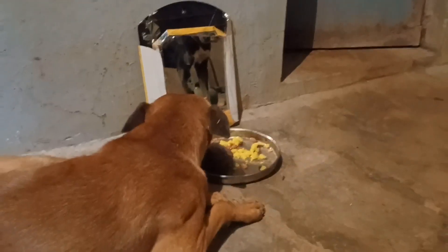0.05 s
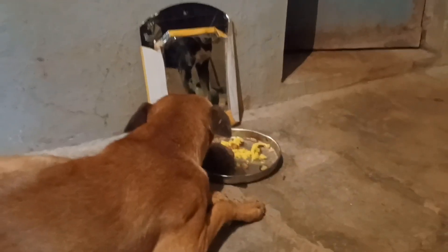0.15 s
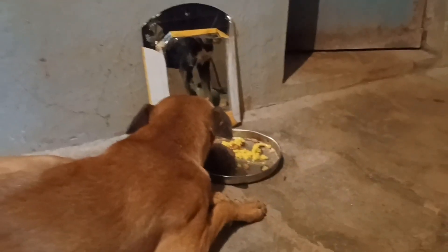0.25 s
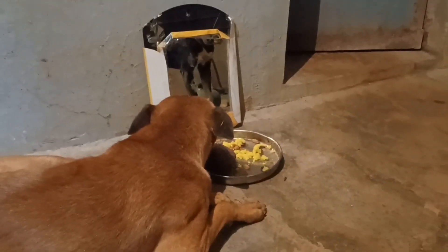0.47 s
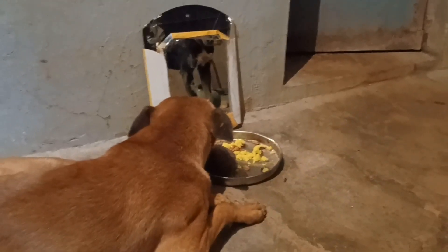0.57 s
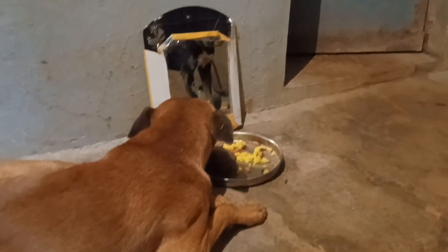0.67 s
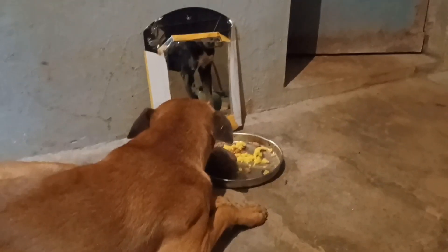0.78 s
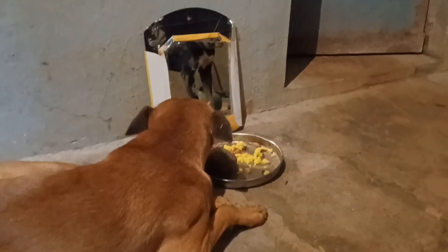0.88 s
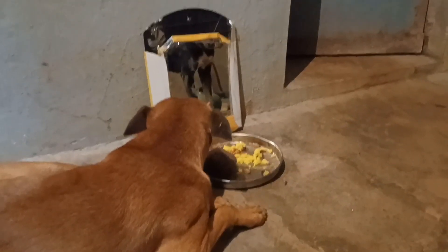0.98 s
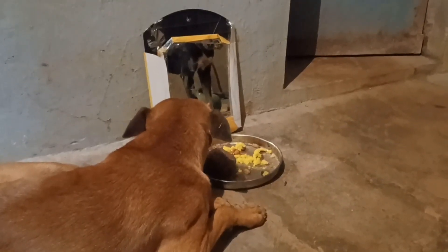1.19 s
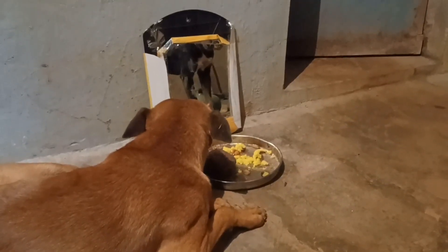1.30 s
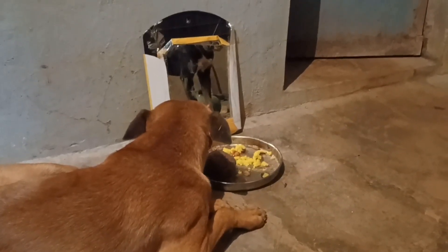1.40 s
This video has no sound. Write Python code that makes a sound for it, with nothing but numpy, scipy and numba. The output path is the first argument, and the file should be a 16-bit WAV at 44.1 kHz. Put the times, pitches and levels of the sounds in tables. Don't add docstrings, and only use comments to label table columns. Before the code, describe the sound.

A dog close to the microphone smacks its wet lips, growls low, opens into a loud raspy snarl, groans with mouth nearly shut, then whimpers briefly upward; small bare-walled space, faint distant murmur.

```python
import sys
import numpy as np
from scipy import signal
from scipy.fft import rfft, irfft, next_fast_len
from scipy.io import wavfile
from scipy.ndimage import uniform_filter1d, minimum_filter1d
from numba import njit

SR = 44100
rng = np.random.default_rng(int(sys.argv[2]) if len(sys.argv) > 2 else 0)


def ratio_of_db(decibels):
    return 10 ** (np.asarray(decibels, float) / 20)


def unload_audio(sound):
    columns = np.transpose(np.atleast_2d(sound))
    steps = np.round(np.clip(columns, -1, 1) * 32767)
    wavfile.write(sys.argv[1], SR, steps.astype(np.int16))


N = 63945

# [f/Hz, level/dB]
MURMUR = [(40, -4.5), (100, -2.5), (230, 1), (400, -13), (700, -23.5), (1300, -18.5), (4000, -36),
          (15000, -38.5)]
MURMUR_DB, MURMUR_EARLY_DB, MURMUR_PATCHY_DB = -62.5, 11, 2
# [f/Hz, width/Hz, level/dB]
HUM = [(238, 5.3, -67.5), (610, 17, -80), (740, 25, -97), (870, 19, -91.5)]
# [t/s, f/Hz, level/dB, length/s]
HUM_SWELLS = [(-0, 610, 6.5, .02), (1.263, 238, 13.5, 0.022), (1.268, 870, 17, 0.034),
              (1.305, 740, 19, 0.011), (1.298, 610, 4, 0.023), (1.4, 610, -4, 0.013),
              (1.44, 610, 4.5, 0.0148)]

ROOM_DB, ROOM_T60_S, WALL_CUT_HZ, SIDE_FROM_HZ = -19.5, 0.22, 1300, 290

# [t/s, peak level/dB, extra level away from the main ring/dB]
SMACKS = [
    (0.0496, -40, 6.5),
    (.072, -45.5, 17.5),
    (0.0817, -28.5, -1),
]
# [f/Hz, level/dB, t60/s]
LIP_RINGS = [(610, -4, .025), (1314, -14, 0.021), (253, -18.5, 0.18), (2160, -34.5, 0.0144)]
LIP_SOFT_HZ = 260
SNUFFLE_S = (.045, .09, .118, .14)
SNUFFLE_DB, SNUFFLE_OPEN = -52.5, 1

# [t/s, level/dB]
RUMBLE = [(0, -78), (.065, -47.5), (.09, -76.5), (.115, -61), (.14, -71), (0.159, -40.5), (.28, -31),
          (.46, -41.5), (.52, -55.5), (.85, -57), (.93, -51), (1.041, -44), (1.07, -58), (1.2, -82.5)]
RUMBLE_HZ, RUMBLE_WIDTH_HZ = 90, 50

# [f/Hz, width/Hz, level/dB mouth shut, gain/dB wide open]
HISS = [(3127, 250, -41, -2), (4010, 420, -59.5, 10.5), (4900, 490, -60, -10), (5670, 240, -55.5, 3.5),
        (6710, 2100, -49, 7), (9340, 1500, -55, 7), (12150, 990, -57.5, 16.5), (14500, 1500, -57.5, 16)]
HISS_LIKENESS = 0.14
HISS_FOLLOWS = 0.71
HISS_PAN_DB, HISS_PAN_TOP_DB = -4.5, -2.4
FANG_RISE = 0.15

# [f/Hz, width/Hz, level/dB mouth shut, gain/dB wide open, share f rises wide open]
THROAT = [(118, 34.1, -0.5, -1, 0.28), (232.8, 71.4, 5, -6, 0.26), (578, 100.7, -16, 20.5, 0.0047),
          (937.7, 113, -29.5, 21.5, 0.034), (1207, 83, -30, 21, 0.12), (1600, 160, -37.5, 9, 0.0033),
          (1953, 76.3, -37, 34.5, 0.028), (2350, 287, -49, 26, 0.01), (3464, 410, -35, 20, 0.16)]
# [left minus right/dB, left leads/rad]
ARRIVAL = [(-2, .05), (-3.4, .25), (-1, .75), (-3, 1.0), (-5, 1.4), (-5, 1.6), (-6.5, .8), (-6, -1.0),
           (-3, -2.0)]
THROAT_CUT_HZ, WANDER, WANDER_DB = 3306, .015, 1.5
NOSE_HZ, NOSE_WIDTH_HZ, NOSE_SHARE = 486, 260, 0.22

# [t/s, pitch f/Hz, level/dB, roughness 0-1, mouth opening 0-1]
GROWL = [
    (.146, 96.14, -38.5, 0.23, 0.15),
    (.165, 96, -29, 0.37, 0.42),
    (.2, 100.6, -26.5, 0.4, 0.29),
    (.24, 105.7, -22.5, 0.44, 0.38),
    (.29, 104.1, -22, 0.32, 0.31),
    (.325, 123.9, -18.5, 0.7, 0.16),
    (.35, 128.6, -20, 0.28, 0.44),
    (.375, 134.5, -17, 0.54, 0.3),
]
# [t/s, pitch f/Hz, level/dB, roughness 0-1, mouth opening 0-1]
SNARL = [
    (.375, 124.3, -16.5, 0.75, 0.33),
    (.425, 118, -18, 0.82, 0.26),
    (.46, 116.9, -18.5, 0.68, 0.49),
    (.51, 128.3, -17.5, 0.67, 0.43),
    (.55, 140.1, -10, 0.64, 0.86),
    (.585, 142.9, -4, .9, 1.02),
    (.625, 145.5, -15.5, 1, 0.88),
    (.685, 129, -28.5, 0.88, 0.26),
]
# [t/s, pitch f/Hz, level/dB, roughness 0-1, mouth opening 0-1]
GROAN = [
    (.66, 123.1, -22.5, .6, 0.23),
    (.73, 125.8, -24, 0.64, 0.039),
    (.8, 121.6, -26, .72, 0.059),
    (.86, 118, -24, .45, 0.014),
    (.905, 126.7, -23.5, 0.39, 0.13),
    (.94, 124.8, -29.5, 0.18, 0.44),
    (.982, 139.6, -24.5, 0.29, 0.22),
    (1.0, 132.7, -33, 0.23, 0.44),
]
# [t/s, pitch f/Hz, level/dB, roughness 0-1, mouth opening 0-1]
WHIMPER = [
    (.998, 200.1, -32, 0.24, 0.2),
    (1.025, 210.6, -30, 0.043, 0.2),
    (1.055, 222.7, -28, 0.021, 0.39),
    (1.097, 239, -29, .04, 0.3),
    (1.112, 325.4, -27, 0.5, 0.24),
    (1.132, 349.9, -31, 0.27, 0.22),
    (1.152, 329.8, -32, .45, 0.27),
    (1.176, 221.5, -27, 0.29, 0.094),
    (1.205, 219, -52.5, 0.6, 0.28),
]
GROWL_SHAPE = 0.42, [0.3, 3.1, 5.5, 0, 2.5, 6, -8], [0.089, 0.1, 1.4, 12, 0.5, 6.4, 0.1], [-17.5, -9.5,
               -12.5, -2.5, 2.5, -7, -5.5, 1.5]
SNARL_SHAPE = 0.88, [0.9, -0.74, 5.5, 6, -4, 0, -5.5], [1.8, -1.8, -0.75, -1.9, 0.5, 4, -3], [8.5, -8, -4.5,
               2.5, -1, -2, 3, 0]
GROAN_SHAPE = 0.45, [2, 7.5, -13.5, 2.5, -2.5, 3.5, -3.5], [3.5, -1.5, 14.5, -5.5, 2, 0, 0.5], [-7, 8.5,
               8.5, 0.5, 5.5, 3, -4, -2]
WHIMPER_SHAPE = 0.011, [8, 4.5, -3, -18, 6, 3.5, 1.5], [-1, 3, 15.5, -6.5, 2, -2.5, -1.5], [-10.5, 7.5, 6.5,
                 1.5, 2, 11, -6, 3.5]
# [t/s, depth/dB, length/s]
CATCHES = [(0.312, 9.5, 0.0044), (0.321, -1.5, 0.015), (0.348, 6, .008), (0.368, 7.5, .005),
           (0.401, 7.5, 0.0052), (0.413, 6, 0.0034), (.45, 4.5, .007), (0.482, 8.5, 0.0073),
           (0.543, 7.5, 0.0059), (0.55, -5, 0.0065), (0.564, 6.5, .004), (0.58, 5, 0.0041),
           (0.585, 3, .006), (0.607, 11, .007), (0.618, -6.5, 0.0081), (0.629, 6, 0.0097),
           (0.692, 1, 0.009), (0.76, 1, 0.0075), (0.807, 6, 0.0079), (0.854, 4.5, 0.0095),
           (0.877, 4, 0.0034), (1.12, 2.5, .004), (1.165, 8, 0.005)]
RELEASE_SHARE = .45
FADE_S, PULSE_CUT_HZ, SECOND_FULL_AT = 0.0031, 736, 0.17
BREATH_DB, BREATH_FROM_HZ, RASP_DB = -18, 1810, -10.5
JITTER, JITTER_HZ, SHIMMER_DB, FLUTTER_DB, FLUTTER_HZ = .105, 70, 2.6, 1.3, 28
CHEST_BELOW_HZ = 170
GAPE_FROM, GAPE_CHEST_DB = .62, -43.5

LIMIT, LOW_CUT_HZ = .8, 82


def rms_one(x):
    return x / np.sqrt(np.mean(x ** 2) + 1e-20)


def evened(x):
    power = uniform_filter1d(uniform_filter1d(np.mean(x ** 2, axis=0), size=900), size=900)
    return x / np.sqrt(power + 1e-12)


def drift(hz):
    r = np.exp(-2 * np.pi * hz / SR)
    return rms_one(signal.lfilter([1], [1, -2 * r, r * r], rng.standard_normal(N + 9000))[9000:])


def filtered(x, order, hz, kind="low"):
    return signal.sosfilt(signal.butter(order, hz, kind, fs=SR, output="sos"), x)


def tilt(db):
    return ratio_of_db(np.array([[db], [-db]]))


@njit
def resonate(x, hz, width, sr):
    out, r = np.zeros(len(x)), np.exp(-np.pi * width / sr)
    for i in range(2, len(x)):
        push = (1 - r * r) / 2 * (x[i] - x[i - 2])
        out[i] = push + 2 * r * np.cos(2 * np.pi * hz[i] / sr) * out[i - 1] - r * r * out[i - 2]
    return out


def hum():
    t, out = np.arange(N) / SR, 0
    for hz, width, db in HUM:
        level_db = db + 2.2 * drift(15)
        for s, at_hz, up_db, length in HUM_SWELLS:
            if abs(at_hz / hz - 1) < 1 / 10:
                level_db = level_db + up_db * np.exp(-((t - s) / length) ** 2)
        tone = resonate(rng.standard_normal(N), np.full(N, 1. * hz), width, SR)
        out = out + ratio_of_db(level_db) * rms_one(tone)
    return out * tilt(-1.7)


def far_murmur():
    out, edges = 0, 35 * 2 ** np.arange(0, 8.9, .4)
    hz, db = np.transpose(MURMUR)
    white = rng.standard_normal((2, 2, N))
    for k, (low, high) in enumerate(zip(edges, edges[1:])):
        mid, side = filtered(white[k % 2], 2, [low, high], "band")
        gain = ratio_of_db(np.interp(np.log(low * high) / 2, np.log(hz), db) + MURMUR_PATCHY_DB * drift(24))
        spread = np.clip(low / 3000, .15, 1) * side * [[1], [-1]]
        out = out + gain * (mid * tilt(-1.5) + spread)
    sinking = ratio_of_db(MURMUR_EARLY_DB * np.linspace(1, 0, N))
    return sinking * (ratio_of_db(MURMUR_DB - 9) * rms_one(out) + hum())


def room(x):
    size = next_fast_len(N + SR)
    turn = np.exp(-2j * np.pi * np.arange(size // 2 + 1) / size)
    dull = np.exp(-2 * np.pi * WALL_CUT_HZ / SR)
    wall = (1 - dull) / (1 - dull * turn)
    answer = np.zeros((2, len(turn)), complex)
    for k, lag in enumerate(rng.integers(700, 1900, size=16)):
        loop = ratio_of_db(-60 * lag / SR / ROOM_T60_S) * wall * turn ** lag
        answer[k % 2] += loop / (1 - loop) * (-1) ** (k // 2)
    left, right = irfft(answer * rfft(x.mean(axis=0), size), size)[:, :N]
    side = filtered(left - right, 2, SIDE_FROM_HZ, "high")
    return (left + right) * tilt(-1.6) + side * [[1], [-1]]


def smacks():
    out = np.zeros(N)
    for hz, db, t60 in LIP_RINGS:
        clicks = np.full(N, 1e-18)
        for s, peak_db, thin_db in SMACKS:
            extra_db = thin_db * (not 500 < hz < 700)
            clicks[int(s * SR)] = ratio_of_db(peak_db + db + 2.0 + extra_db + rng.normal())
        r, w = ratio_of_db(-60 / (t60 * SR)), 2 * np.pi * hz / SR
        ring = signal.lfilter([0, np.sin(w)], [1, -2 * r * np.cos(w), r * r], clicks)
        out += resonate(ring, np.full(N, 1. * hz), LIP_SOFT_HZ, SR)
    return filtered(out, 2, 1700) * tilt(-1.5)


def snuffle():
    gusts = rng.standard_normal(N) * ratio_of_db(5.9 * drift(90))
    shape_db = [-11, 3.0, 11.5, 3.0, -9.0, 8.5, 6]
    air = evened(throat(gusts, np.full(N, SNUFFLE_OPEN), shape_db, np.zeros(7)))
    return ratio_of_db(SNUFFLE_DB) * np.interp(np.arange(N) / SR, SNUFFLE_S, [0, 1, 1, 0]) * air


def rumble():
    s, db = np.transpose(RUMBLE)
    centre = np.full(N, 1. * RUMBLE_HZ)
    shaking = resonate(rng.standard_normal(N), centre, RUMBLE_WIDTH_HZ, SR)
    shaking = resonate(shaking, centre, RUMBLE_WIDTH_HZ, SR)
    return ratio_of_db(np.interp(np.arange(N) / SR, s, db)) * tilt(-1) * rms_one(shaking)


def hiss(mouth, shape_db):
    out = 0
    for (hz, width, db, open_db), extra_db in zip(HISS, shape_db):
        centre = hz * (1 + FANG_RISE * mouth * (hz < 3600))
        mid, side = (resonate(resonate(w, centre, width, SR), centre, width, SR)
                     for w in rng.standard_normal((2, N)))
        alike = np.clip(HISS_LIKENESS * np.cos(np.pi * (hz - 2500) / 9000) * 4, -.8, .8)
        wide = rms_one(np.sqrt(1 + alike) * mid + np.sqrt(1 - alike) * side * [[1], [-1]])
        pan_db = HISS_PAN_DB if hz < 9000 else HISS_PAN_TOP_DB
        out = out + ratio_of_db(db + extra_db + open_db * mouth + 2.5 * drift(21)) * wide * tilt(pan_db / 2)
    return out


def throat(source, mouth, shape_db, shift, chest_db=0):
    out, n = np.zeros((2, N)), np.arange(N)
    swallowed = resonate(source, np.full(N, 1. * NOSE_HZ), NOSE_WIDTH_HZ, SR)
    source = source - np.clip(NOSE_SHARE * (1 - mouth), 0, 1) * swallowed
    shifts, extras_db = [0, 0, *shift], [chest_db, 0, *shape_db]
    for k, ((hz, width, db, open_db, rise), (pan_db, lead)) in enumerate(zip(THROAT, ARRIVAL)):
        centre = hz * (1 + shifts[k] / 100 + rise * mouth + WANDER * drift(4.8))
        level_db = db + open_db * mouth + extras_db[k] + WANDER_DB * drift(7.9) * (k > 2)
        rung = resonate(resonate(source, centre, 1.824 * width, SR), centre, 1.367 * width, SR)
        rung = rung * ratio_of_db(level_db) * (-1) ** k
        lag = lead / (2 * np.pi * hz) * SR / 2
        out += tilt(pan_db / 2) * [np.interp(n + lag, n, rung), np.interp(n - lag, n, rung)]
    return filtered(out, 8, THROAT_CUT_HZ)


def catches(t):
    depth = 0
    for at, depth_db, length in CATCHES:
        span = length * np.where(t > at, RELEASE_SHARE, 1)
        depth = depth + depth_db * np.exp(-((t - at) / span) ** 2)
    return ratio_of_db(-depth)


def voice(rows, second, throat_db, shift, hiss_db):
    s, *columns = np.transpose(rows)
    t = np.arange(N) / SR
    hz, db, rough, mouth = (np.interp(t, s, c) for c in columns)
    rough, mouth = np.clip(rough, 0, 1), np.clip(mouth, 0, 1.2)

    turns = np.cumsum(hz * np.exp(JITTER * rough * drift(JITTER_HZ))) / SR
    cycle = (2 * turns).astype(int)
    second_share = second * np.clip(rough / SECOND_FULL_AT, .3, 1)
    shimmer = ratio_of_db(SHIMMER_DB * rough * rng.standard_normal(1999)[cycle])
    strength = shimmer * np.where(cycle % 2, second_share, 1)
    pulses = filtered(np.diff(cycle, prepend=0) * strength + 1e-18, 2, PULSE_CUT_HZ)
    rasp = ratio_of_db(RASP_DB) * rough * strength * np.exp(-1.5 * (2 * turns % 1)) * rng.standard_normal(N)

    breath = ratio_of_db(BREATH_DB) * filtered(rng.standard_normal(N), 2, BREATH_FROM_HZ, "high")
    caught = catches(t)
    flutter = ratio_of_db(FLUTTER_DB * rough * drift(FLUTTER_HZ))
    source = flutter * (rasp - pulses) + (0.13 + .9 * rough) * breath / caught ** 0.5
    chest_db = -14 * (hz > CHEST_BELOW_HZ) + GAPE_CHEST_DB * np.maximum(mouth - GAPE_FROM, 0)
    tone = ratio_of_db(db) * evened(throat(source, mouth, throat_db, shift, chest_db))

    puffs = 0.79 + np.exp(-2.5 * (turns % 1))
    air = ratio_of_db(HISS_FOLLOWS * (db + 23) - 34.5 + 6.5) * hiss(mouth, hiss_db) * puffs
    sounding = np.clip(np.minimum(t - s[0], s[-1] - t) / FADE_S + .5, 0, 1)
    return sounding * (caught * tone + caught ** 0.2 * air)


def scene():
    calls = voice(GROWL, *GROWL_SHAPE) + voice(SNARL, *SNARL_SHAPE)
    calls = calls + voice(GROAN, *GROAN_SHAPE) + voice(WHIMPER, *WHIMPER_SHAPE)
    dog = calls + smacks() + snuffle() + rumble()
    return dog + ratio_of_db(ROOM_DB) * room(dog) + far_murmur()


def top_cut(x):
    return signal.sosfilt(signal.butter(12, 15410, fs=SR, output="sos"), x)


def record(dry):
    safe_gain = np.minimum(1, LIMIT / (np.abs(dry).max(axis=0) + 1e-9))
    safe_gain = minimum_filter1d(safe_gain, size=441)
    held = dry * uniform_filter1d(uniform_filter1d(safe_gain, size=200), size=200)
    mix = filtered(held, 4, LOW_CUT_HZ, "high")
    return top_cut(mix)


dry = scene()
out = record(dry)
unload_audio(out)
```